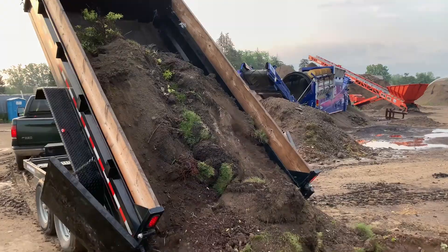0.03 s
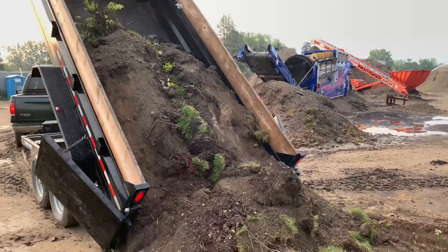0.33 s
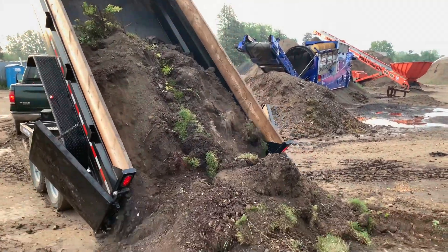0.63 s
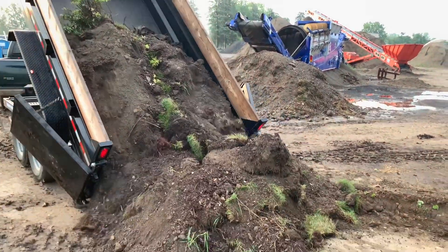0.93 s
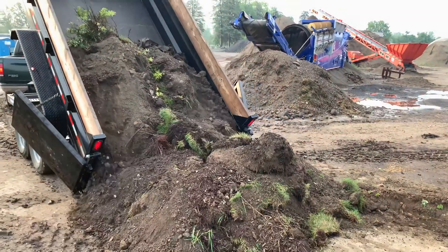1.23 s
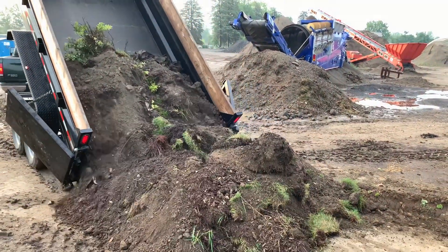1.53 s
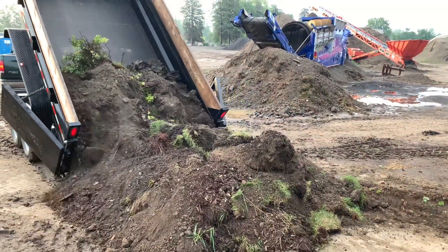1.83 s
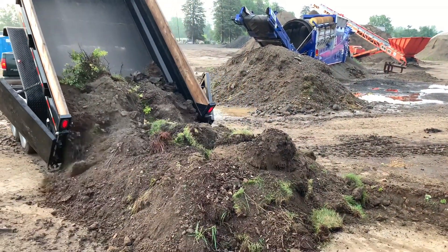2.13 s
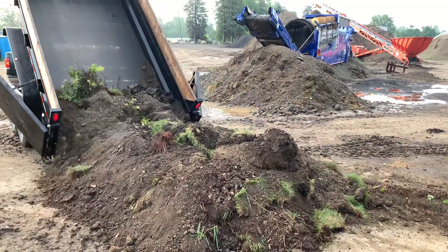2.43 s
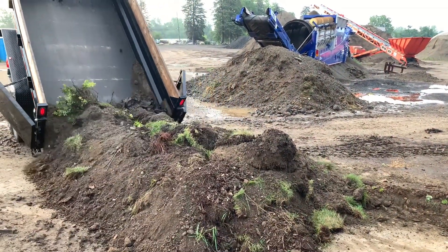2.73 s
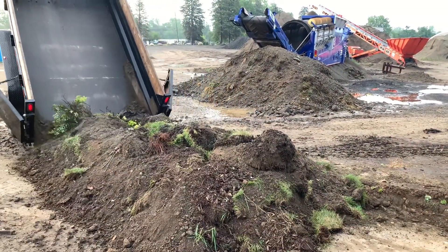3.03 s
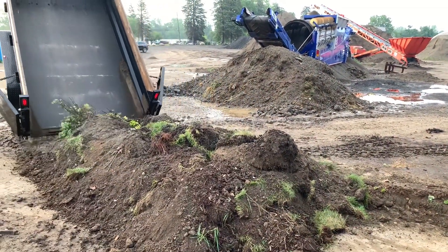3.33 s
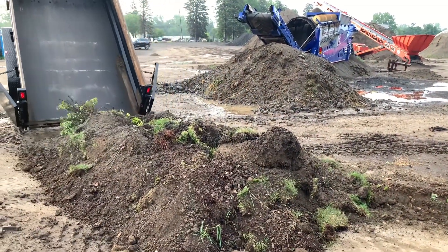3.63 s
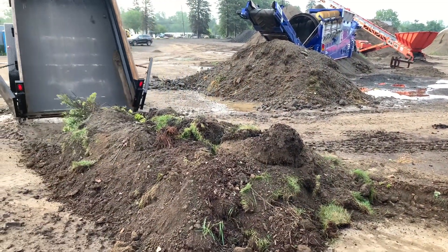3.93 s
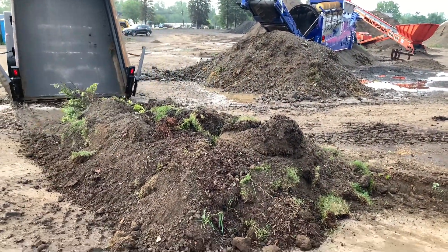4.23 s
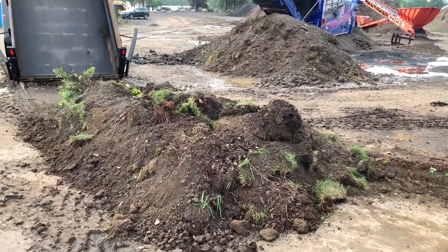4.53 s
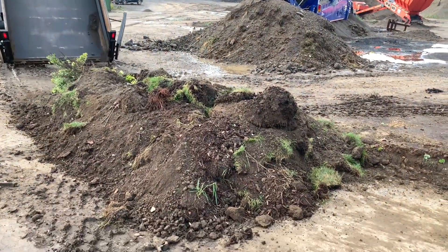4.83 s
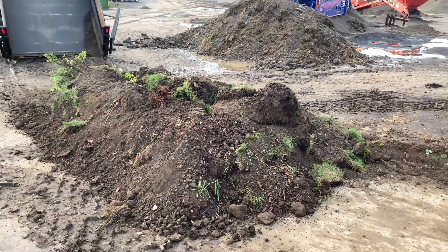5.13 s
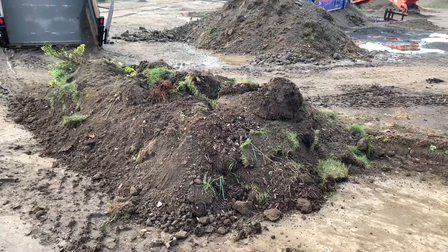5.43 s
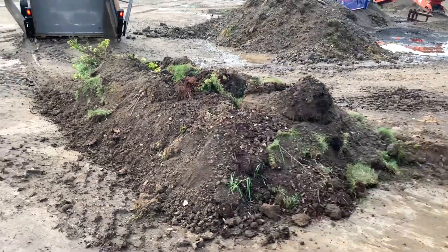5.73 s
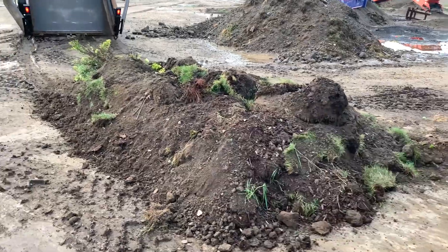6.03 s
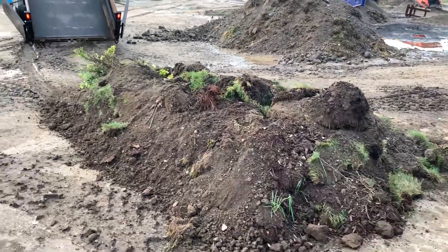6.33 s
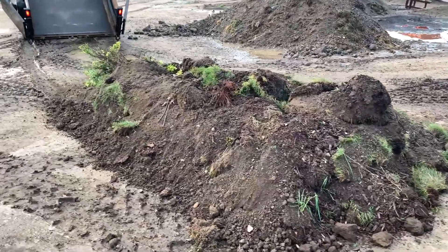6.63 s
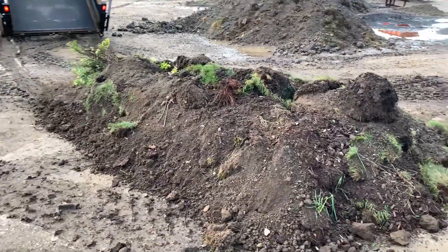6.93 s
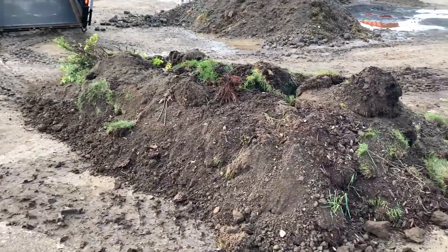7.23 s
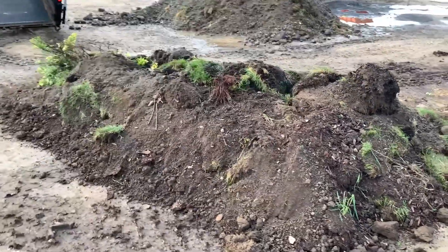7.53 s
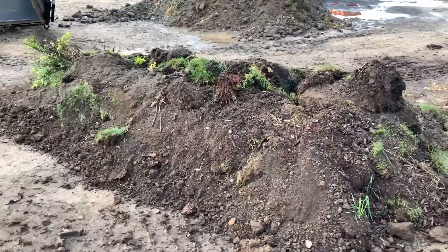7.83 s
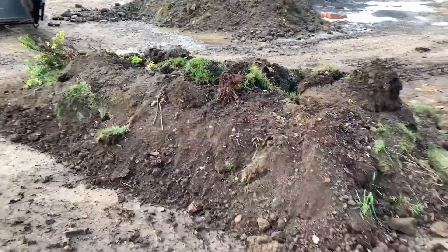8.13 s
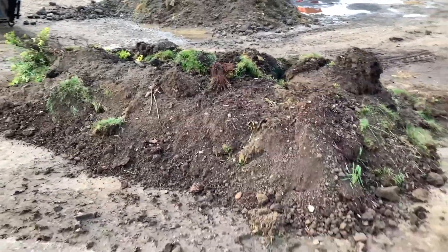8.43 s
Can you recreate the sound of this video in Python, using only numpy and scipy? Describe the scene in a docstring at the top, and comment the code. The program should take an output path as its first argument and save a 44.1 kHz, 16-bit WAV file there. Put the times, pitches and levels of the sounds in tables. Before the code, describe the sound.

Soil slides off a tipped steel trailer with thuds and a gritty rush, then a pickup pulls away, tyres crunching as crumbs trickle.

```python
"""A tipped steel trailer dumps soil in an open yard: clods thud, grit scrapes the ringing bed, stones
strike the steel and fine earth hisses. After a second the pickup ahead revs for the first of three
pushes forward. Near 3 s the bed is empty and the tyres take over, rumbling and crunching through ruts;
then the gate clinks and squeals. At the end the engine is back at idle, crumbs still trickle down the
heap and far machinery whines."""
import sys
import numpy as np
from scipy import signal
from scipy.fft import rfft, irfft, next_fast_len
from scipy.io import wavfile
from scipy.ndimage import uniform_filter1d

SR = 44100
rng = np.random.default_rng(int(sys.argv[2]) if len(sys.argv) > 2 else 0)


def to_wav(sig):
    """Store sig (one row per channel, or 1-D mono) as 16-bit WAV at the path in sys.argv[1].

    Samples outside -1..1 are clipped; the rate is SR.
    """
    pcm = np.clip(np.atleast_2d(sig), -1, 1) * 32767
    pcm = np.round(pcm).astype(np.int16)
    wavfile.write(sys.argv[1], SR, pcm.T)  # frames by channels


N = 383669
T = np.arange(N) / SR
FFT_SIZE = next_fast_len(N + 16384, real=True)
FREQ = np.arange(FFT_SIZE // 2 + 1) * SR / FFT_SIZE
BED_EMPTY_S, ROLL_ENDS_S = 2.92, 6.75
IDLE_HZ, IDLE_DB = 45.36, -34.5

# A colour says how strong a sound is from bass to treble. A fade (t60) is the time to drop 60 dB.
# colour of earth landing on earth: (frequency [Hz], level [dB])
CLOD_COLOUR = [(35, -38), (60, 5.5), (130, -2.5), (200, 2), (300, 1.5), (420, -4.5), (520, -14),
               (1000, -5.5), (6000, -109)]
# colour of grit dragged over steel: (frequency [Hz], level [dB])
SCRAPE_COLOUR = [(200, -14), (480, -10.5), (680, 2.5), (900, 2.5), (1400, -4.5), (1700, -6.5), (2300, -6),
                 (4000, -47), (12000, -95)]
# colour of crumbs and stems breaking: (frequency [Hz], level [dB])
CRUMBLE_COLOUR = [(700, -22), (1800, -1.5), (2600, -5.5), (3700, -5.5), (5000, -4.5), (6200, -8),
                  (8000, -48)]
# colour of fine earth running: (frequency [Hz], level [dB])
HISS_COLOUR = [(2500, -2), (5500, -3.5), (6600, 3.5), (7400, 5.5), (8000, -2.5), (9100, 3.5), (10200, -4),
               (11300, -4), (12500, -12), (15500, -6.5)]
# notes the steel bed rings at: (pitch [Hz], width [Hz], level [dB])
BED_MODES = [(175, 50, 3), (245.5, 7.5, 7.5), (284, 35, 7), (352, 22, 8), (402, 103, 8), (691, 25, 7.5),
             (1022, 15, 5.5), (1118, 15, -0.5), (1310, 64, 3), (1820, 5.7, -17), (3713, 120, 6),
             (4360, 150, -2.5)]
# masses of soil slide off the bed: (middle [s], length [s], swell [dB])
SOIL_SLUMPS = [(0.494, 0.2, 6.5), (0.81, 0.56, 4), (1.308, 0.69, 9.5), (1.91, 0.47, 9), (2.323, 0.37, 7)]
# stones and lumps hit the bed: (time [s], boom [dB], clang [dB], fade [s])
BED_BLOWS = [(0.1, -32, -25, 0.34), (0.253, -24.5, -17.5, 0.33), (0.715, -28, -21, 0.36),
             (0.633, -41, -27, 0.27), (0.79, -32, -30.5, 0.34), (0.92, -26.5, -32, 0.21),
             (1.182, -30, -27.5, 0.16), (1.301, -15.5, -36, 0.31), (1.385, -24, -31, 0.3),
             (1.69, -30, -30.5, 0.62), (1.856, -32, -31, 0.42), (2.105, -35, -29, 0.36),
             (2.136, -47, -34.5, 0.76), (2.364, -44, -34.5, 0.49), (2.468, -23, -43, 0.11),
             (6.122, -49, -29, 0.082), (6.157, -55, -33.5, 0.11)]
# knocks and jolts ring a panel or the whole bed: (time [s], pitch [Hz], level [dB], fade [s])
BED_KNOCKS = [(0.256, 1910, -19, 0.12), (0.258, 680, -24, 0.36), (0.11, 181.7, -28, 0.82),
              (0.715, 1824, -17, 0.072), (0.716, 351.4, -17.5, 0.41), (0.716, 1280, -19, 0.091),
              (1.3, 270, -6.5, 0.1), (1.345, 97, -19, 0.25), (1.187, 286, -19.5, 0.23),
              (1.86, 276, -15.5, 0.19), (2.129, 1430, -29.5, 0.26), (1.399, 56.5, -22.5, 0.84),
              (1.919, 55.4, -19, 0.43), (2.8, 99.4, -25, 0.67), (3.95, 84.4, -19, 0.57),
              (6.228, 56.6, -25, 0.36), (6.85, 112, -24.5, 0.36)]
# colour of the exhaust pipe: (frequency [Hz], level [dB])
PIPE_COLOUR = [(36, -17.5), (46, -5), (62, -3), (90, 1), (115, -2), (140, -12), (190, -12.5), (300, -25),
               (3000, -108)]
# the pickup pulls forward: (throttle on [s], throttle off [s], top firing rate [Hz],
# coasting time [s], swell [dB], level change while coasting [dB])
ENGINE_PUSHES = [(1.119, 2.345, 95.5, 0.33, 2.5, -4.5), (3.0, 4.08, 119.2, 0.85, 2.5, 0.5),
                 (5.88, 6.422, 82.55, 0.65, 3.5, 1.5)]
# colour of soil and tyres rumbling on bare ground: (frequency [Hz], level [dB])
GROUND_COLOUR = [(40, -29.5), (70, -0.5), (105, 4.5), (215, 0.5), (320, -0.5), (450, -10.5), (1000, -46),
                 (6000, -77)]
# colour of gravel under the tyres: (frequency [Hz], level [dB])
GRAVEL_COLOUR = [(250, -8), (550, -10), (760, 2), (920, 2.5), (1150, -3), (1600, -10.5), (2600, -10.5),
                 (5000, -40), (12000, -67)]
# the tyres crush through ruts: (middle [s], length [s], rumble swell [dB], gravel swell [dB])
TYRE_RUTS = [(4.003, 1.16, 9.5, 11.5), (4.8, 0.76, 8.5, 2.5), (6.11, 0.62, 7, 7.5), (6.77, 0.47, 1, 4.5),
             (7.269, 0.34, 10, -2)]
# flow of earth down the heap after the dump: (time [s], strength [dB])
HEAP_FLOW = [(3.4, -57.5), (4.4, -52.5), (5.5, -54), (6.1, -58.5), (6.5, -67), (6.7, -59.5), (7.12, -57.5),
             (7.3, -62), (8.0, -68), (8.45, -63.5), (8.7, -51.5)]
# pebbles tumble: (time [s], strength [dB], share of crunch [dB], pitch [Hz], rattle fade [s])
PEBBLE_FALLS = [(0.167, -25.5, -2, 4130, 0.21), (0.408, -24.5, -11, 3460, 0.2),
                (0.634, -21, -10, 2560, 0.18), (0.786, -21, -25, 7600, 0.27),
                (0.893, -31.5, -1, 3770, 0.47), (2.22, -29, -10, 2620, 0.16),
                (3.279, -31, -36, 7210, 0.058), (4.226, -37.5, -13, 7000, 0.11),
                (4.381, -38.5, -30, 7500, 0.34), (4.9263, -43, -29, 7460, 0.13),
                (5.221, -42, -2, 3400, 0.041), (5.4666, -36.5, -3.5, 7170, 0.11),
                (5.581, -42, -25, 8300, 0.16), (5.7277, -41, -16, 6930, 0.1), (6.232, -48, -27, 8700, 0.24),
                (6.317, -50, -15, 7260, 0.11), (6.449, -49.5, -34, 6900, 0.098),
                (6.5812, -42.5, -5, 4246, 0.11), (7.086, -52, -20, 6880, 0.13),
                (7.2113, -38, -28, 6930, 0.092), (7.3952, -42.5, -15, 6950, 0.18),
                (7.437, -46, -16, 4970, 0.13), (7.5002, -45, -10, 4720, 0.11), (7.6826, -45, -14, 7630, .1),
                (7.8238, -49, -20, 7170, 0.056), (8.0886, -50, -12, 6740, 0.14),
                (8.536, -50, -9, 6470, 0.07)]
# stones snap against each other: (time [s], level [dB])
STONE_SNAPS = [(0.79, -15.5), (4.93, -32.5), (5.043, -39), (5.4709, -29), (5.5632, -32), (5.727, -36),
               (6.2317, -44), (7.438, -41)]
# bright notes of those stones: (pitch [Hz], width [Hz], level [dB])
STONE_MODES = [(8950, 420, 0), (15300, 600, -10)]
# short plops and clicks: (time [s], pitch [Hz], level [dB], length [s])
PLOP_EVENTS = [(6.123, 1290, -24, 0.0014), (6.15, 2710, -32, 0.0015), (6.9262, 631, -19.5, 0.0066),
               (6.928, 1720, -26.5, 0.0024), (7.66, 334.5, -28.5, 0.0099), (8.188, 2650, -28, 0.00044)]
# loose steel scrapes on the gate: (time [s], strength [dB], fade [s])
GATE_CLINKS = [(4.452, -41, 0.15), (4.488, -43.5, 0.1)]
# notes of that loose steel: (pitch [Hz], width [Hz], level [dB])
LATCH_MODES = [(2440, 100, 5), (2790, 110, 2.5), (4117, 78, 7.5), (5800, 120, -5), (7090, 66, 7),
               (7650, 150, 1.5), (10800, 3100, -7.5), (15200, 1000, -6)]
# the gate squeals and the trailer creaks: (middle [s], length [s], pitch [Hz], level [dB])
STEEL_SQUEAKS = [(4.458, 0.17, 1060, -44), (5.59, 0.043, 1340, -45), (5.655, 0.62, 1322, -53),
                 (5.699, 0.079, 1372, -43.5)]
# colour of far machinery: (frequency [Hz], level [dB])
YARD_COLOUR = [(150, -6.5), (310, -10), (500, -10.5), (760, -10), (950, -19), (1450, -22.5), (2200, -19.5),
               (2900, -29), (4000, -35), (5300, -48), (7000, -29), (12000, -97)]
# whine of that machinery: (pitch [Hz], width [Hz], level [dB])
MACHINE_WHINE = [(1259, 200, -58.5), (2530, 310, -63.5)]
# how far the left channel leads the right: (frequency [Hz], phase [radians])
STEREO_PHASE = [(0, 0), (1400, 1.4), (2800, 4.8), (5200, 8.1), (6200, 6.2), (15700, -6.3)]
# how alike the two channels are: (frequency [Hz], likeness [0-1])
STEREO_LIKENESS = [(300, 0.99), (900, 0.94), (2200, 0.63), (3700, 0.19), (5600, 0.43), (7200, 0.45),
                   (8600, 1), (15000, 0.78)]
# which side is louder: (frequency [Hz], left minus right [dB])
STEREO_BALANCE = [(400, 0), (700, 2), (1200, 1), (2000, -2.5), (3700, -1.5), (5300, -6), (6600, -0.5)]


def sliding_soil(clods, scrape, crumble, hiss, top_db=6.5, dull_db_per_s=3.0):
    """Heavy lumps, grit and countless fine grains slide off; the coarse part comes in slumps."""
    slump_db = sum(db * hump(s, length) for s, length, db in SOIL_SLUMPS)
    rumble_db = ebb(start_db=-33.5, thin_db_per_s=2.5, end_s=2.56, fall_db_per_s=10) + slump_db
    grit_db = ebb(start_db=-34, thin_db_per_s=4.5, end_s=2.1, fall_db_per_s=9.5) + 1.01 * slump_db
    crumbs_db = ebb(start_db=-34.5, thin_db_per_s=3.5, end_s=2.27, fall_db_per_s=18)
    fines_db = ebb(start_db=-32.5, thin_db_per_s=0.63, end_s=BED_EMPTY_S, fall_db_per_s=31)
    rumble = stream(clods, per_s=700, spread_db=1, surge_hz=12, surge_db=3) * undb(rumble_db)
    grit = stream(scrape, per_s=1200, spread_db=-3, surge_hz=13, surge_db=1.7) * undb(grit_db)
    crumbs = stream(crumble, per_s=2200, spread_db=-0.5, surge_hz=17, surge_db=1) * undb(crumbs_db)
    fines = stream(hiss, per_s=11000, spread_db=-1, surge_hz=13.88, surge_db=1) * undb(fines_db)
    return rumble + grit + crumbs + treble(fines, 11600, top_db - dull_db_per_s * T)


def blows(clods, scrape, crack, thin_db_per_s=4):
    """Lumps burst on the bed: the steel booms and clangs, and the crunch weakens as the soil thins."""
    s, boom_db, clang_db, t60 = np.transpose(BED_BLOWS)
    boom = struck(clods, bursts(s, boom_db, t60, rise_s=0.00084), per_s=3700)
    clang = struck(scrape, bursts(s, clang_db, t60, rise_s=0.00076), per_s=6000)
    crunch_db = clang_db - thin_db_per_s * s
    crunch = struck(crack, bursts(s, crunch_db, 0.55 * t60, rise_s=0.00034), per_s=12000)
    return boom + clang + crunch


def knocks(neighbour_ratio=0.86, neighbour_db=-18.5):
    """Clods and jolts thud on the bed's low notes, stones clank on high ones; a nearby note joins in."""
    out = np.zeros((2, N))
    for s, hz, db, t60 in BED_KNOCKS:
        note = ring(hz, t60, rise_s=1 / hz)
        neighbour = undb(neighbour_db) * ring(neighbour_ratio * hz, t60, rise_s=1 / hz)
        add(out, s, undb(db) * (note + neighbour))
    return out


def small_stones():
    """Small stones in the load ping on the steel and click on each other."""
    steel_db = ebb(start_db=-38.5, thin_db_per_s=7, end_s=0.81, fall_db_per_s=19)
    clicks_db = ebb(start_db=-42, thin_db_per_s=1.5, end_s=2.35, fall_db_per_s=21)
    steel = pings(1767, 2030, t60=0.12, spread_db=3, count=260)
    clicks = pings(2600, 7600, t60=0.025, spread_db=12, count=3600)
    return steel * undb(steel_db) + clicks * undb(clicks_db)


def last_sheet(hz=6850, width_hz=900, db=-42):
    """The last thin sheet of earth skids over bare steel with a bright, narrow hiss."""
    band = resonances([(hz, width_hz, 0)]) ** 2
    return noise(band) * undb(db) * hump(middle_s=2.43, length_s=2.1)


def engine_drive(lag_s=0.069, top_hold_s=0.15, rev_db_per_octave=2.5, recede_db_per_s=0.5):
    """Firing rate and level: each push speeds the engine up and makes it louder, then it coasts."""
    hz, throttle_db = IDLE_HZ * (1 + 0.015 * wander(2)), 0
    for on, off, top_hz, coast_s, swell_db, coast_db in ENGINE_PUSHES:
        idle_at = off + coast_s
        hz += (top_hz - IDLE_HZ) * plateau(on, off - top_hold_s, off, idle_at)
        throttle_db += swell_db * plateau(on, on + lag_s, off, off + lag_s)
        throttle_db += coast_db * plateau(off, off + lag_s, idle_at, idle_at + lag_s)
    rev_db = rev_db_per_octave * np.log2(hz / IDLE_HZ)
    return hz, IDLE_DB + throttle_db + rev_db - recede_db_per_s * T


def engine(lumpy_db=1.5, hum_db=-4, burble_db=-1):
    """Steady firings hum through the exhaust pipe, while uneven ones burble."""
    hz, db = engine_drive()
    phase = 2 * np.pi * np.cumsum(hz * (1 + 0.006 * wander(10))) / SR
    harmonics = np.arange(1, 5)[:, None]
    weights = undb(read_at(PIPE_COLOUR, harmonics * hz))
    hum = np.sum(weights * np.sin(harmonics * phase), axis=0)
    hum /= np.sqrt(np.sum(weights ** 2, axis=0) / 2)
    burble = stream(response(PIPE_COLOUR), per_s=400, spread_db=1.5, surge_hz=3.46, surge_db=0.7)
    even_db = np.interp(hz, [47, 56], [2, 0])  # at idle the firings are more even: the hum stands out
    hum *= undb(hum_db + even_db + lumpy_db * wander(13))
    return undb(db) * (hum + undb(burble_db - even_db) * burble)


def tyres(takeover_s=0.7, bright_db=4, dull_db_per_s=2.5):
    """Tyres rumble and crunch, swell in each rut, grow duller with distance and stop."""
    ground_db = ebb(start_db=-39.5, thin_db_per_s=0.51, end_s=ROLL_ENDS_S, fall_db_per_s=11)
    gravel_db = ebb(start_db=-45, thin_db_per_s=1.72, end_s=ROLL_ENDS_S, fall_db_per_s=10)
    for s, length, rumble_swell, gravel_swell in TYRE_RUTS:
        ground_db += rumble_swell * hump(s, length)
        gravel_db += gravel_swell * hump(s, length)
    ground = stream(response(GROUND_COLOUR), per_s=800, spread_db=2, surge_hz=12, surge_db=0.9)
    gravel = stream(response(GRAVEL_COLOUR), per_s=3800, spread_db=0, surge_hz=21.03, surge_db=1.5)
    top_db = bright_db - dull_db_per_s * np.maximum(T - BED_EMPTY_S, 0)
    rumble = treble(ground * undb(ground_db), 283, top_db)
    fade_in = np.interp(T, [BED_EMPTY_S - takeover_s, BED_EMPTY_S + takeover_s], [0, 1])
    return fade_in * (rumble + gravel * undb(gravel_db))


def rut_crunch(crumble, db=-52):
    """A tyre crunches over loose grit in one rut."""
    grit = unit(through(grains(per_s=900, spread_db=1), crumble))
    return grit * undb(db) * hump(middle_s=6.06, length_s=0.42)


def runoff(crumble, hiss, fines_db=4.5, crumbs_db=-56):
    """Fine earth runs down the heap, duller when the flow is weak; crumbs follow the flow loosely."""
    flow_db = curve(HEAP_FLOW)
    lull_db = flow_db - flow_db.max()
    fines = stream(hiss, per_s=9300, spread_db=0.5, surge_hz=23, surge_db=1.6)
    crumbs = stream(crumble, per_s=4500, spread_db=1.5, surge_hz=22.24, surge_db=2)
    earth = fines * undb(flow_db + fines_db) + crumbs * undb(crumbs_db + 0.76 * lull_db)
    fade_in = np.interp(T, [BED_EMPTY_S, HEAP_FLOW[0][0]], [0, 1])
    return fade_in * treble(earth, 6700, 0.59 * lull_db)


def pebbles(crumble, hiss, body_db=1, spray_db=-4.5, ring_db=-4, ring_t60=0.0056):
    """Pebbles click and rattle, each at its own pitch and with a little spray of grit."""
    s, level_db, share_db, pitch, rattle_t60 = np.transpose(PEBBLE_FALLS)
    out = struck(crumble, bursts(s, level_db + share_db + body_db, rattle_t60, rise_s=0.0009), per_s=7000)
    out += struck(hiss, bursts(s, level_db + spray_db, rattle_t60, rise_s=0.00021), per_s=7800)
    age = np.arange(SR // 10) / SR
    for when, db, hz, t60 in zip(s, level_db, pitch, rattle_t60):
        note = np.sin(2 * np.pi * hz * age) * fade(age, ring_t60)
        rattle = rng.standard_normal(len(age)) * fade(age, t60)
        ringing = signal.fftconvolve(rattle, note / np.linalg.norm(note))[:len(age)]
        add(out[0], when, undb(db + ring_db) * ringing)
    return treble(out, hz=11000, db=-5)


def snaps(t60=0.021):
    """Stone meets stone with one sharp, bright snap."""
    s, db = np.transpose(STONE_SNAPS)
    envelope = bursts(s, db, np.full(len(s), t60), rise_s=0.00027)
    return struck(resonances(STONE_MODES), envelope, per_s=12000)


def trickle(hiss, spray_t60=0.051, share_db=-6):
    """Once the bed is empty, crumbs patter down the heap, each with a short spray of grit."""
    age = np.arange(SR // 5) / SR
    hops = np.abs(grains(per_s=70, spread_db=2)[0])
    sprays = signal.fftconvolve(hops, fade(age, spray_t60))[:N]
    patter = unit(struck(hiss, sprays, per_s=8000))
    return patter * (T > BED_EMPTY_S) * undb(curve(HEAP_FLOW) + share_db)


def plops():
    """Plops and clicks, each only a few waves long."""
    out = np.zeros(N)
    for s, hz, db, length in PLOP_EVENTS:
        age = np.arange(int(length * SR)) / SR
        swell = np.sin(np.pi * age / length) ** 2
        add(out, s, undb(db) * swell * np.sin(2 * np.pi * hz * age))
    return out


def latch(boost_db=7):
    """Loose steel on the swinging gate scrapes and rings on."""
    s, db, t60 = np.transpose(GATE_CLINKS)
    return struck(resonances(LATCH_MODES), bursts(s, db + boost_db, t60, rise_s=0.0049), per_s=3100)


def squeaks():
    """Dry steel rubs with a rough, unsteady pitch."""
    return sum(undb(db) * hump(s, length) * rough_tone(hz, width_hz=72, waver=0.016, waver_hz=34)
               for s, length, hz, db in STEEL_SQUEAKS)


def yard(murmur_db=-52, pulse_db=3.5, pulse_hz=28):
    """Far machinery murmurs; its wavering whine comes up as the trailer draws away, then eases."""
    murmur = noise(undb(read_at(YARD_COLOUR)))
    whine = 0
    for hz, width, db in MACHINE_WHINE:
        whine += undb(db + pulse_db * wander(pulse_hz)) * rough_tone(hz, width, waver=0.028, waver_hz=17)
    return undb(murmur_db + 0.2 * wander(13)) * murmur + whine * hump(middle_s=7.1, length_s=8.4)


def undb(db):
    """Turn decibels into a gain."""
    return 10 ** (np.asarray(db) / 20)


def unit(x):
    """Scale to an average power of 1."""
    return x / np.sqrt(np.mean(x ** 2))


def add(out, s, sound):
    """Mix a sound in from a given time."""
    start = int(s * SR)
    out[..., start:start + sound.shape[-1]] += sound[..., :N - start]


def curve(points):
    """Join (time, value) points with straight lines."""
    return np.interp(T, *np.transpose(points))


def plateau(*corners_s):
    """Rise from 0 to 1, hold and fall back, set by four times."""
    return np.interp(T, corners_s, [0, 1, 1, 0])


def hump(middle_s, length_s):
    """A smooth rise from 0 to 1 and back."""
    return np.cos(np.pi * np.clip((T - middle_s) / length_s, -0.5, 0.5)) ** 2


def fade(age, t60):
    """Die away by 60 dB every t60 seconds."""
    return np.exp(-np.log(1000) * age / t60)


def ebb(start_db, thin_db_per_s, end_s, fall_db_per_s):
    """Level in dB of a flow that thins slowly, then dies away after its end."""
    return start_db - thin_db_per_s * T - fall_db_per_s * np.maximum(T - end_s, 0)


def wander(per_s):
    """A smooth random drift of size about 1."""
    hold = int(SR / per_s)
    steps = np.repeat(rng.standard_normal(N // hold + 1), hold)
    return 1.3 * uniform_filter1d(uniform_filter1d(steps, hold), hold)[:N]


def bursts(times, dbs, t60s, rise_s):
    """The envelope (loudness over time) of blows that swell quickly and die away."""
    out, age = np.zeros(N), np.arange(SR // 2) / SR
    for s, db, t60 in zip(times, dbs, t60s):
        add(out, s, undb(db) * (1 - np.exp(-age / rise_s)) * fade(age, t60))
    return out


def read_at(points, hz=FREQ):
    """Read between (frequency, value) points, with octaves evenly spaced."""
    frequency, value = np.transpose(points)
    return np.interp(np.log(hz + 1), np.log(frequency), value)


def response(colour):
    """Turn a colour into a filter that rings only after a hit, never before."""
    cepstrum = irfft(np.log(undb(read_at(colour))), FFT_SIZE)
    cepstrum[1:FFT_SIZE // 2] *= 2
    cepstrum[FFT_SIZE // 2 + 1:] = 0
    return np.exp(rfft(cepstrum))


def resonances(modes):
    """A filter that rings at a body's own notes, its modes."""
    return sum(undb(db) * 1j * FREQ * width / (hz ** 2 - FREQ ** 2 + 1j * FREQ * width)
               for hz, width, db in modes)


def through(x, gain):
    """Filter a sound, with one gain for each frequency."""
    return irfft(rfft(x, FFT_SIZE) * gain, FFT_SIZE)[..., :N]


def treble(x, hz, db):
    """Raise or lower everything above hz; db may move in time."""
    return x + (undb(db) - 1) * through(x, 1 - 1 / (1 + (FREQ / hz) ** 8))


def noise(colour):
    """Two rows of filtered noise."""
    return unit(through(rng.standard_normal((2, N)), colour))


def grains(per_s, spread_db):
    """Tiny random impacts of mixed sizes; one row arrives directly, the other scattered."""
    out, hits = np.zeros((2, N)), rng.random(N) < per_s / SR
    size = undb(spread_db * np.minimum(rng.exponential(size=N)[hits], 5))
    out[:, hits] = rng.standard_normal((2, N))[:, hits] * size
    return unit(out)


def stream(colour, per_s, spread_db, surge_hz, surge_db):
    """A coloured flow of grains that comes in small surges."""
    return unit(through(grains(per_s, spread_db), colour)) * undb(surge_db * wander(surge_hz))


def struck(colour, envelope, per_s):
    """A shower of tiny hits follows an envelope and rings a body."""
    return through(grains(per_s, 0) * envelope, colour / np.sqrt(np.mean(np.abs(colour) ** 2)))


def ring(hz, t60, rise_s):
    """One struck note, as a direct and a scattered row."""
    age = np.arange(int(t60 * SR)) / SR
    wave = np.sin(2 * np.pi * (hz * age + rng.random((2, 1))))
    return wave * (1 - np.exp(-age / rise_s)) * fade(age, t60)


def pings(low_hz, high_hz, t60, spread_db, count):
    """Small stones at random moments, each with its own pitch and size."""
    out = np.zeros((2, N))
    for when, pitch, size in rng.random((count, 3)):
        hz = low_hz * (high_hz / low_hz) ** pitch
        add(out, when * N / SR, undb(spread_db * size ** 2) * ring(hz, t60, rise_s=t60 / 100))
    return unit(out)


def rough_tone(hz, width_hz, waver, waver_hz):
    """A narrow, rough tone whose pitch wanders."""
    sway = noise(1 / (1 + (2 * FREQ / width_hz) ** 4))
    phase = 2 * np.pi * np.cumsum(hz * (1 + waver * wander(waver_hz))) / SR
    return sway[0] * np.cos(phase) + sway[1] * np.sin(phase)


def stereo(direct, scattered):
    """Two close microphones: alike in the bass, out of step and less alike higher up."""
    alike = np.clip(read_at(STEREO_LIKENESS), 0, 1)
    common = rfft(direct, FFT_SIZE) * np.sqrt((1 + alike) / 2)
    apart = rfft(scattered, FFT_SIZE) * np.sqrt((1 - alike) / 2)
    lead = np.interp(FREQ, *np.transpose(STEREO_PHASE))
    lean = undb(read_at(STEREO_BALANCE) / 2) * np.exp(0.5j * lead)
    left, right = (common + apart) * lean, (common - apart) / lean
    return irfft(np.array([left, right]), FFT_SIZE)[:, :N]


def scene():
    """Mix soil, heap, pickup and yard; clods, scrapes and crumbs take on the ring of the bed."""
    bed = 1 + resonances(BED_MODES)
    clods, scrape, crumble = (bed * response(c) for c in (CLOD_COLOUR, SCRAPE_COLOUR, CRUMBLE_COLOUR))
    hiss = response(HISS_COLOUR)
    soil = sliding_soil(clods, scrape, crumble, hiss) + blows(clods, scrape, crumble + hiss / 2)
    soil += knocks() + small_stones() + last_sheet()
    heap = runoff(crumble, hiss) + pebbles(crumble, hiss) + snaps() + trickle(hiss)
    direct, scattered = soil + heap + tyres() + rut_crunch(crumble) + latch() + engine() + yard()
    return stereo(direct + plops() + squeaks(), scattered)


def record(dry):
    """Cut the deepest bass and the highest treble."""
    bass_cut = signal.butter(10, 38, "high", fs=SR, output="sos")
    treble_cut = signal.ellip(10, 0.2, 70, 15850, fs=SR, output="sos")
    return signal.sosfilt(treble_cut, signal.sosfilt(bass_cut, dry))


dry = scene()
out = record(dry)
to_wav(out)
```